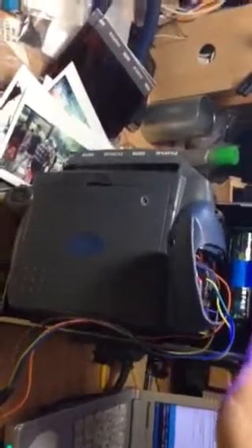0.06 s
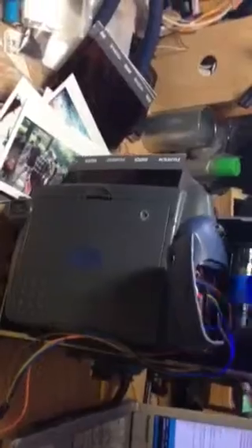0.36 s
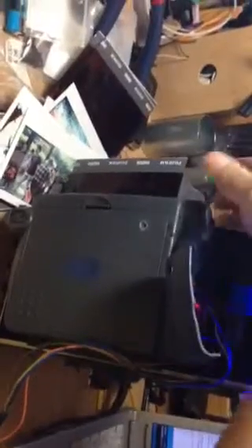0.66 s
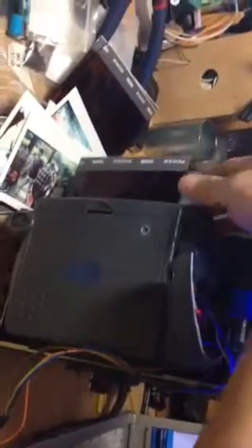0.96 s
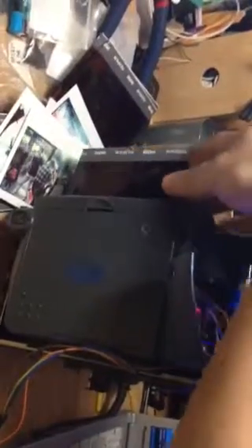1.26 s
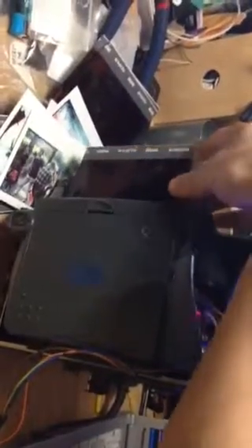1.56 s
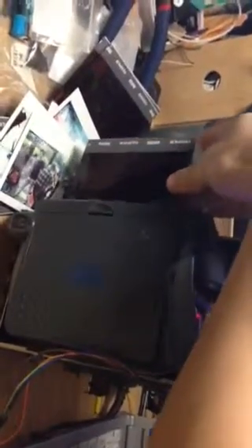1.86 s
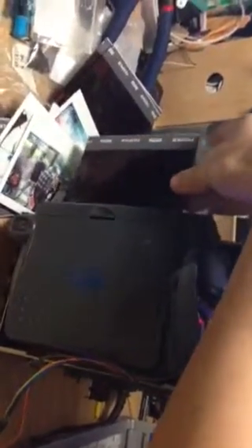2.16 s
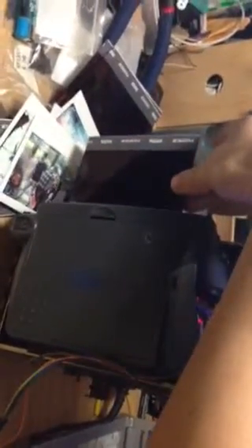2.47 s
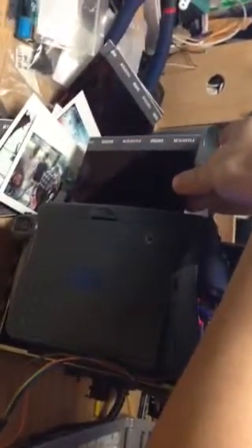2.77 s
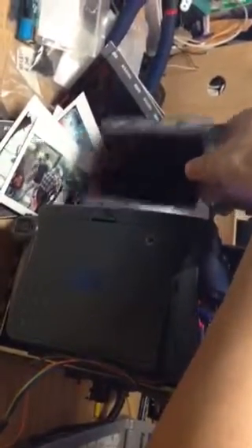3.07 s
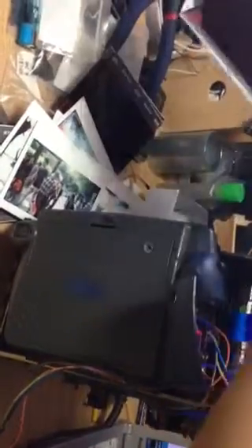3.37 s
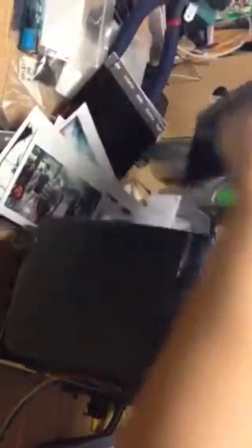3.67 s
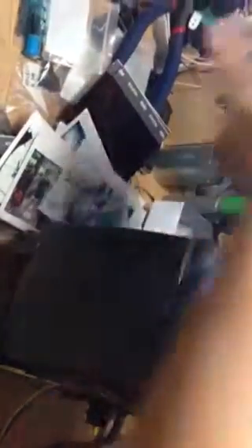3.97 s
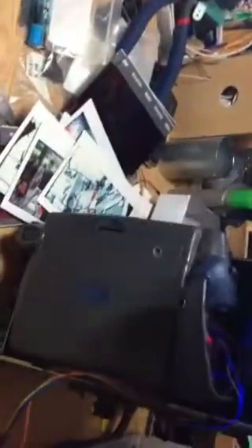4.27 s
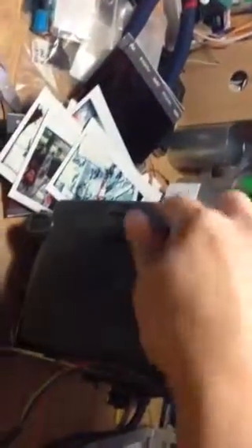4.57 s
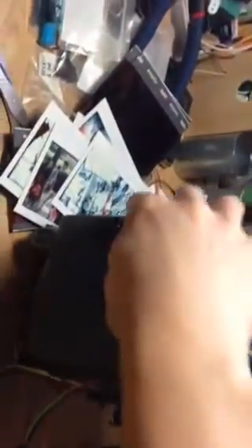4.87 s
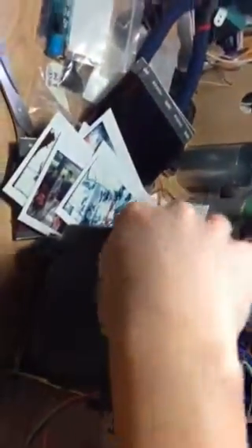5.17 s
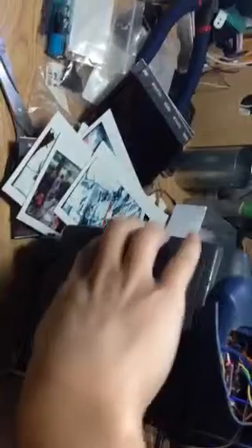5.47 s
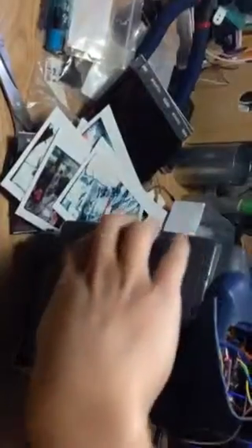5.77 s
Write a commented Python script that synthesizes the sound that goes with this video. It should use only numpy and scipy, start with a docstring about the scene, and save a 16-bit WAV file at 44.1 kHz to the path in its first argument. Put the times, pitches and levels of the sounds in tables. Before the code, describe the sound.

From the start, an instant camera's small geared motor whirrs close by, its teeth humming, ticking and scraping while a print slides out with a thin hiss. Near 1.7 seconds the motor drags down in pitch and a small spring gives a brief, bright ping. From about 1.9 seconds the gears run free, higher and chattering, until the motor brakes with a soft thud at 3.1 seconds. After a short pause, the stiff print slaps onto the workbench near 3.9 seconds in a quick flutter of taps. From 4.5 to 4.9 seconds a hand makes sharp, briefly ringing clicks and a short rub on the plastic case. Near 5.6 seconds the camera shifts on the bench with a soft scrape. The low hum and hiss of a small room continue underneath throughout.

```python
"""An instant camera pushes out a print on a workbench, while a small room hums and hisses throughout.
From the start its geared motor whirrs: the teeth hum, tick and scrape as the print slides out. Near 1.7 s
a cam (a lobe on a wheel) drags the motor down and pings a spring; then the gears run free and chatter.
At 3.1 s the motor brakes with a thud, and near 3.9 s the print slaps onto the bench. From 4.5 s a hand
clicks and rubs on the plastic case, making it ring, and near 5.6 s it shifts the camera."""
import sys
import numpy as np
from scipy import signal
from scipy.fft import rfft, irfft, next_fast_len
from scipy.io import wavfile
from scipy.ndimage import map_coordinates

SR = 44100
rng = np.random.default_rng(int(sys.argv[2]) if len(sys.argv) > 2 else 0)


def pcm_store(signal):
    """Save signal as 16-bit PCM."""
    levels = np.round(np.clip(np.atleast_2d(signal), -1, 1) * 32767)
    wavfile.write(sys.argv[1], SR, levels.astype(np.int16).T)


N = 257103
T = np.arange(N) / SR

# The room's deep rumble, low hum and hiss: (frequency [Hz], relative level [dB])
RUMBLE_TONE = [(12, -60), (26, -40), (36, -23), (44, -8), (54, 18), (66, -9), (110, -26.5)]
ROOM_HUM_TONE = [(60, -12), (95, -14.5), (120, -8.5), (145, 3), (175, -9.5), (208, -2.5), (245, -15.5),
                 (298, -9.5), (400, -19.5), (479, -19), (520, -12.5), (602, -24.5), (1000, -21),
                 (1300, -58)]
ROOM_HISS_TONE = [(590, -66), (1000, -8.5), (1450, -9), (1690, -3.5), (2100, -9.5), (2700, -12), (3450, -8),
                  (3850, -2.5), (4150, -8), (4470, -2), (4850, -11.5), (6800, -14.5), (8300, -18.5),
                  (15500, -22.5)]
# Motor speed, given as how often the gear teeth meet, or "mesh": (time [s], mesh rate [Hz])
MOTOR_SPEED = [(0, 350.8), (0.38, 364.4), (0.42, 388.3), (0.47, 363.7), (0.56, 346.9), (0.9, 338.9),
               (0.95, 380.6), (1.01, 378), (1.06, 358.4), (1.18, 346), (1.41, 348.5), (1.51, 320.7),
               (1.56, 333.8), (1.62, 325), (1.655, 331.8), (1.72, 247.7), (1.76, 244.8), (1.8, 265.6),
               (1.84, 299), (1.88, 312.6), (1.92, 350.4), (1.97, 397.5), (2.09, 398.4), (2.17, 397),
               (2.195, 421), (2.27, 424.7), (2.3, 414.2), (2.39, 411.4), (2.45, 390.7), (2.53, 388.4),
               (2.61, 401.7), (2.64, 408.7), (2.74, 402.3), (2.8, 418.8), (2.86, 409), (2.92, 407.6),
               (2.96, 389), (3.12, 392.4), (3.145, 337), (3.19, 295), (3.22, 210), (3.26, 130.3)]
# Teeth rasping through the case: (frequency [Hz], relative level [dB])
RASP_TONE = [(200, -46), (320, -7), (430, -1.5), (590, -18), (760, -5), (920, -19), (1150, -2.5),
             (1430, -2.5), (1650, -7.5), (1950, -5.5), (2150, -14), (2400, -9.5), (2750, -45), (3600, -48)]
# Gear hiss with the print between the rollers, then without: (frequency [Hz], relative level [dB])
LOADED_HISS_TONE = [(1590, -43), (2430, -3), (2720, -3), (3060, -7), (3980, -0.5), (4600, -0.5),
                    (5100, -0.5), (5780, -7.5), (7520, -9.5), (9220, -16), (10600, -15), (12400, -20),
                    (13900, -19), (15500, -29)]
FREE_HISS_TONE = [(1590, -22), (2500, 3), (2980, -6.5), (3550, 0), (4100, -5), (4470, 0), (5100, -6.5),
                  (5990, -4), (6490, -10), (7100, -12.5), (7680, -11.5), (9710, -15), (10600, -14.5),
                  (11900, -20), (12800, -18), (15500, -28)]
# Overtones of the gear hum, before the housing shapes them: (multiple of mesh rate, level [dB])
GEAR_OVERTONES = [(2, 1.7), (3, -3), (4, -11), (5, -5), (6, -18), (7, -10.5)]
# Pitches at which the housing rings easily: (frequency [Hz], half width [Hz], gain [dB])
HOUSING_RESONANCES = [(337.1, 18, -36), (415, 16.1, -38.5), (496, 22, -57), (698, 41, -52),
                      (776.4, 36, -50), (1205, 87, -44.5), (1482, 148, -42.5), (1812, 91, -40.5),
                      (1977, 34, -48), (2410, 23, -44.5)]
# Ring of the gears under each tooth tick: (frequency [Hz], relative level [dB])
TICK_TONE = [(2000, -17), (2900, 0.5), (3500, 3), (4400, -7), (5100, 4.5), (5700, -10), (7100, -10.5),
             (7650, -5.5), (8300, -20), (9900, -37), (10600, -10), (11400, -36), (15500, -34)]
# Whine of the armature, the motor's spinning core: (multiple of mesh rate, base level [dB])
ARMATURE_OVERTONES = [(9, -70), (10, -70), (11, -66), (12, -67), (13, -71), (14, -70)]
# How the motor's metal can colours that whine: (frequency [Hz], gain [dB])
MOTOR_CAN_TONE = [(2700, -20), (3100, -5), (3500, -2), (4000, 0), (4450, 0), (4700, -4), (5100, -2),
                  (5400, -14)]
# The print sliding through the slot: (time [s], level [dB])
PRINT_SLIDE_LEVEL = [(0, -66), (.3, -63), (.65, -57), (1.0, -63), (1.3, -68), (1.65, -68)]
# Its thin hiss: (frequency [Hz], relative level [dB])
PRINT_SLIDE_TONE = [(4500, -6), (6000, -11), (6700, 1), (7600, -10), (8600, -11), (11000, -31)]
# Ringing notes of a small spring: (frequency [Hz], relative level [dB], time to fade 60 dB [s])
SPRING_NOTES = [(4900, -44, 0.036), (5840, -41, 0.036), (7130, -47, 0.031), (8400, -48, .03),
                (9200, -39.5, 0.023), (10200, -57, .03), (13000, -51, .02)]
# Sizzle of chattering teeth: (frequency [Hz], relative level [dB])
SIZZLE_TONE = [(1000, -40), (2400, 8), (3000, 2), (4000, 8.5), (5200, -2), (6500, -2), (8000, -8),
               (10000, -13), (11900, -17), (12900, -6), (13500, -14), (14200, -10), (15500, -21)]
# The print and fingers meet the bench: (time [s], slap level [dB], thump level [dB])
BENCH_HITS = [(3.8523, -57, -68), (3.9107, -36.5, -44), (3.9170, -38, -43), (3.9661, -36.5, -54),
              (3.9820, -37.5, -67), (3.9888, -45, -51), (3.9948, -50, -65), (4.011, -54, -47.5)]
# The paper's slap and the bench's thump: (frequency [Hz], relative level [dB])
PAPER_TONE = [(60, -30), (200, -8), (800, 1.5), (1400, 5), (2050, 2.5), (2320, 9), (2550, -4), (2850, -11),
              (4800, 1), (6200, -6), (7200, -5.5), (9000, -9.5), (15500, -13.5)]
BENCH_TONE = [(60, -25), (170, 3.5), (270, 1.5), (430, 0), (620, -18), (1500, -47)]
# Clicks of the case under the hand: (time [s], ring [dB], snap [dB], crack [dB], hollow thud [dB],
# first touch compared with the blow [dB], ring length [share of each note's fade time])
HAND_CLICKS = [(4.5125, -29.5, -30.5, -41, -39.5, 3, 0.97), (4.532, -32, -43, -70, -68, -17, 0.73),
               (4.5438, -11, -24, -43, -29.5, -17, 0.87), (4.5672, -35, -34, -41, -67, -10, 0.5),
               (4.608, -32.5, -46, -60, -69, -10, 0.8), (4.618, -39, -46, -65, -70, -5, 0.7),
               (4.629, -45, -49, -65, -70, -12, 0.7), (4.639, -36, -44, -62, -72, -15, 0.6),
               (4.645, -34, -49, -70, -70, -25, 0.6), (4.6538, -16, -35, -40, -51, -22, 0.3),
               (4.667, -46, -55, -66, -70, -15, 0.6), (4.7219, -34.5, -40.5, -50, -71, -18, 0.85),
               (4.7647, -23.5, -43, -56, -32, -1.5, 0.81), (4.883, -55, -62, -77, -75, -10, 0.83)]
# Ringing notes of the plastic case: (frequency [Hz], relative level [dB], time to fade 60 dB [s])
CASE_NOTES = [(1194, -11, 0.03), (1245, -14.5, 0.053), (1356, -7, 0.048), (1384, 4, 0.012),
              (1418, -13.5, 0.073), (1580, -8, 0.02), (1760, -12, 0.03), (1904, -15, 0.046),
              (3300, -21, 0.034), (3920, -21, 0.015), (6930, -25, 0.013)]
# A click's dry snap, and the crack of hard edges meeting: (frequency [Hz], relative level [dB])
SNAP_TONE = [(60, -38), (600, -2), (950, 6), (1600, 14), (2200, -4), (2800, -13), (3300, 1), (4000, 5),
             (5500, -1), (8500, -5), (11000, -14.5), (15500, -38)]
CRACK_TONE = [(2500, -27), (5500, -10), (7500, -7), (9500, -1), (12000, -3), (14500, -5), (15500, -5)]
# Plastic rubs on plastic, hard then light; later the camera shifts on the bench:
# (start [s], rise [s], hold [s], time to fade 60 dB [s], level [dB])
RUB_STROKES = [(4.559, 0.0025, 0.022, 0.058, -33.5), (4.59, 0.0093, 0.047, 0.16, -54.5)]
SHIFT_STROKES = [(5.55, 0.032, 0.0065, 0.29, -49)]
# Colour of the rub and of the shift: (frequency [Hz], relative level [dB])
RUB_TONE = [(60, -65), (300, -19), (800, -18), (930, -11.5), (1250, -1), (1750, -10), (2300, -15),
            (2850, -16.5), (3250, -3), (3650, -16), (4100, -9), (5800, -26), (7250, -20), (15500, -46)]
SHIFT_TONE = [(100, -33), (560, -13), (730, -2), (900, -18), (1210, -1), (1400, -16), (1600, -3),
              (1800, -26), (2050, -0.5), (2450, -19), (2800, -13), (4000, -20), (12000, -36)]
# How long the walls keep an echo going: (frequency [Hz], time to fade 60 dB [s])
ECHO_TIMES = [(200, 0.34), (1500, 0.22), (10000, 0.097)]

# Below, "speed" is the mesh rate [Hz], "mesh" counts teeth met so far, "t60" is time to fade 60 dB [s].
WHEEL_TEETH, PINION_TEETH = 28.1, 4  # teeth met per turn of the big wheel and of the small gear
PLAY_LOADED, PLAY_FREE = 0.008, 0.018  # loose teeth meet early or late by about this share of a tooth
WAVER_LOADED_DB, WAVER_FREE_DB = 1.1, 1.5  # unsteady loudness of the gear tones
FREE_S, FREE_OVER_S = 1.86, 0.078  # when the cam lets go, and how long that takes
CHATTER_HZ = 401.3  # the teeth chatter above this mesh rate


def amp(db):
    """Turn decibels into a gain to multiply by."""
    return 10 ** (np.asarray(db) / 20)


def unit(x):
    """Scale a sound to an average strength (rms) of 1."""
    return x / np.sqrt(np.mean(x ** 2) + 1e-20)


def along(points, hz):
    """Read between (frequency, value) points, spaced as the ear hears pitch."""
    freqs, values = np.transpose(points)
    return np.interp(np.log(hz + 1), np.log(freqs + 1), values)


def wobble(rate, steps=8):
    """A smooth random curve that passes through `rate` new values a second."""
    knots = rng.standard_normal(int(N * rate / SR) + 4)
    fine = np.arange(len(knots) * steps) / steps
    return np.interp(T * rate, fine, map_coordinates(knots, [fine]))


def fade(start_s, t60):
    """A gain that stays at 1 until start_s, then dies away."""
    return amp(-60 * np.maximum(T - start_s, 0) / t60)


def filtered(x, response):
    """Turn each frequency up or down by the gain response(hz)."""
    size = next_fast_len(N + 8192)
    return irfft(rfft(x, size) * response(np.fft.rfftfreq(size, 1 / SR)), size)[:N]


def coloured(x, spectrum, size=4096):
    """Give a sound a tone colour, with a filter that rings only after each hit."""
    cepstrum = irfft(np.log(amp(along(spectrum, np.fft.rfftfreq(size, 1 / SR)))))
    cepstrum[1:size // 2] *= 2  # move the ringing from before the hit to after it
    cepstrum[size // 2 + 1:] = 0
    response = irfft(np.exp(rfft(cepstrum)))
    return signal.fftconvolve(x, response / np.linalg.norm(response))[:N]


def noise(spectrum, gate=1):
    """Noise shaped in time by the gate, then coloured and scaled to strength 1."""
    return unit(filtered(gate * rng.standard_normal(N), lambda hz: amp(along(spectrum, hz))))


def tone(cycles):
    """A pure tone of strength 1 that starts anywhere in its cycle."""
    return np.sqrt(2) * np.sin(2 * np.pi * (cycles + rng.random()))


def burst(t, db, t60):
    """A puff of noise that dies away."""
    return amp(db - 60 * t / t60) * rng.standard_normal(len(t))


def ring(t, hz, db, t60):
    """A struck note that dies away."""
    return amp(db - 60 * t / t60) * np.sin(2 * np.pi * hz * t)


def add(track, start_s, sound):
    """Mix a short sound into a track."""
    part = track[round(start_s * SR):][:len(sound)]
    part += sound[:len(part)]


def room_background(rumble_db=-75, hum_db=-60, hiss_db=-61, arm_s=3.57, arm_width_s=0.69):
    """The room hums and hisses; its deep rumble swells while an arm moves."""
    swell_db = 5 * np.exp(-((T - arm_s) / arm_width_s) ** 2)
    rumble = amp(rumble_db + swell_db + 0.5 * wobble(3.88)) * noise(RUMBLE_TONE)
    hum = amp(hum_db + wobble(26)) * noise(ROOM_HUM_TONE)
    hiss = amp(hiss_db + 0.053 * wobble(4.9)) * noise(ROOM_HISS_TONE)
    return rumble + hum + hiss


def motor_whirr(mesh, speed, power_off_s=3.119, scrape_end_s=3.154):
    """The turning gears sing and scrape; when the power is cut, the tones die first."""
    scrape = tooth_scrape(mesh, speed)
    wheel = wheel_rub(mesh, speed)
    tones = gear_tones(mesh, speed) + wheel
    return fade(power_off_s, t60=0.11) * tones + fade(scrape_end_s, t60=0.15) * scrape


def tooth_scrape(mesh, speed, rasp_db=-45, hiss_db=-55.5, tick_db=-62.5):
    """Meeting teeth rasp, hiss and tick over the motor's whine; faster is louder."""
    pace = speed / 380
    bite = amp(1.5 * wobble(150))  # the teeth grip unevenly
    blend = np.interp(T, [1.3, 2], [0, np.pi / 2])  # the print leaves the rollers
    hiss = np.cos(blend) * noise(LOADED_HISS_TONE, bite) + np.sin(blend) * noise(FREE_HISS_TONE, bite)
    ticks = tooth_ticks(mesh)
    sizzle = chatter_sizzle(mesh, speed, bite)
    rasp = amp(rasp_db) * pace ** 1.7 * noise(RASP_TONE, bite * pulsing(mesh))
    treble = amp(hiss_db) * hiss + amp(tick_db) * ticks + armature_whine(mesh, speed)
    return rasp + sizzle + pace ** 0.73 * treble


def tooth_ticks(mesh, uneven_db=2):
    """Each tooth gives one sharp tick, not quite on time, that rings the gears."""
    scatter = 0.5 * freed(PLAY_LOADED, PLAY_FREE) * wobble(250)
    teeth = np.diff(np.floor(mesh + scatter), prepend=0)
    ticks = np.diff(teeth * amp(uneven_db * wobble(300)), prepend=0)
    return unit(coloured(unit(ticks), TICK_TONE))


def armature_whine(mesh, speed, poles=3, waver_db=3, free_db=-3):
    """High tones follow the motor's speed; its unequal magnetic poles make them swell once a turn."""
    cycles = mesh + 0.017 * wobble(45)
    swell = 1 + 0.85 * np.cos(2 * np.pi * mesh / poles)
    whine = sum(amp(db + along(MOTOR_CAN_TONE, k * speed) + waver_db * wobble(18)) * tone(k * cycles)
                for k, db in ARMATURE_OVERTONES)
    return amp(freed(0, free_db)) * unit(swell) * whine


def wheel_rub(mesh, speed, level_db=-48, multiple=3.5, swell_db=8, shaft_db=1.5):
    """An off-centre wheel sings once a turn, dropping in pitch as it binds; loose teeth roughen it."""
    slop = 0.04 * wobble(14)  # it binds a little early or late
    turn = np.cos(2 * np.pi * (mesh / WHEEL_TEETH - 0.16 + slop))
    shaft = np.cos(2 * np.pi * mesh / PINION_TEETH)
    cycles = multiple * mesh + freed(0.075, 0.3) * wobble(130)
    song = tone(cycles + 0.92 * turn)
    song *= amp(swell_db * turn + shaft_db * shaft + WAVER_LOADED_DB * wobble(100))
    return amp(level_db + along(RASP_TONE, multiple * speed)) * unit(song) * pulsing(mesh)


def gear_tones(mesh, speed, hum_db=-0.52, beat_ratio=13 / 14, beat_db=-18, lag_s=0.005):
    """Meeting teeth hum with overtones, which judder under strain and turn rough as the teeth rattle."""
    strain, rattle = labour(speed), chatter(speed)
    turn = 2 * np.pi * mesh / WHEEL_TEETH
    drag = 0.035 * np.sin(turn) + freed(0, 0.013) * np.sin(2 * turn)  # the big wheel drags as it turns
    play = freed(PLAY_LOADED, PLAY_FREE) + 0.03 * strain + 0.016 * rattle
    loose = mesh + drag + play * wobble(110)
    drive_db = hum_db + 3 * rattle - 7 * strain + 0.5 * wobble(44.2)
    lagged = np.interp(T - lag_s, T, speed)  # the housing takes a moment to follow
    tones = housing(lagged) * amp(drive_db) * tone((mesh + loose) / 2)  # the heavy case halves the play
    # A slightly slower second gear beats against the hum.
    tones += housing(beat_ratio * speed) * amp(beat_db) * tone(beat_ratio * loose)
    rough_db = 1.5 * np.maximum(strain, freed(0, 1)) * wobble(160)
    depth_db = freed(WAVER_LOADED_DB, WAVER_FREE_DB) + 1.8 * rattle
    for k, db in GEAR_OVERTONES:
        waver_db = depth_db * wobble(35.05)
        tones += housing(k * speed) * amp(db + waver_db + rough_db) * tone(k * loose)
    return tones


def housing(hz):
    """The housing's gain: a gear tone swells as it crosses a pitch where the housing rings."""
    return np.sqrt(sum((amp(db) / (1 + ((hz - centre) / width) ** 2)) ** 2
                       for centre, width, db in HOUSING_RESONANCES))


def print_slide():
    """The print hisses thinly as it slides out through the slot."""
    level_db = np.interp(T, *np.transpose(PRINT_SLIDE_LEVEL), right=-np.inf)
    return amp(level_db) * noise(PRINT_SLIDE_TONE)


def labour(speed, below_hz=290, width_hz=15):
    """Strain on the motor: 0 at working speed, 1 while the cam drags it down."""
    return (1 - np.tanh((speed - below_hz) / width_hz)) / 2


def spring_ping(start_s=1.7145, ring_db=-3, snap_db=-46, snap_t60=0.035, rise_s=0.00045):
    """The cam loads a small spring: a dry snap and a few bright notes that die at once."""
    track, t = np.zeros(N), np.arange(SR // 8) / SR
    notes = sum(ring(t, hz, ring_db + db, t60) for hz, db, t60 in SPRING_NOTES)
    band = signal.butter(2, [4500, 10000], "band", fs=SR, output="sos")
    snap = amp(snap_db - 60 * t / snap_t60) * unit(signal.sosfilt(band, rng.standard_normal(len(t))))
    add(track, start_s, (notes + snap) * (1 - np.exp(-t / rise_s)))
    return track


def freed(loaded, free):
    """A setting that slides from its loaded value to its free one as the cam lets go."""
    return np.interp(T, [FREE_S, FREE_S + FREE_OVER_S], [loaded, free])


def pulsing(mesh, bind_db=1.7, tooth_db=2, bind_turn=0.4):
    """Gain of the scraping: the free wheel binds twice a turn, and each tooth scrapes in a burst."""
    bind = np.cos(4 * np.pi * (mesh / WHEEL_TEETH - bind_turn))
    return amp(freed(0, bind_db) * bind + freed(0, tooth_db) * np.cos(2 * np.pi * mesh))


def chatter(speed, width_hz=2.5):
    """0 while the teeth run smoothly, 1 once they are fast enough to chatter."""
    return (1 + np.tanh((speed - CHATTER_HZ) / width_hz)) / 2


def chatter_sizzle(mesh, speed, bite, sizzle_db=-54, squeal_db=-57.5):
    """Chattering teeth sizzle in spurts and squeal faintly in high overtones that waver together."""
    sizzle = amp(sizzle_db + 1.5 * wobble(60)) * noise(SIZZLE_TONE, bite)
    slipping = mesh + 0.305 * wobble(70)
    squeal = sum(amp(along(SIZZLE_TONE, k * CHATTER_HZ)) * tone(k * slipping) for k in range(6, 14))
    return chatter(speed) * (sizzle + amp(squeal_db) * unit(squeal))


def motor_brake(mesh, start_s=3.131, thud_hz=336, thud_db=-38, hum_db=-62, rise_s=0.0047):
    """The braking motor thuds in the hollow case, and a last low hum falls with its speed."""
    t = np.maximum(T - start_s, 0)
    thud = ring(t, thud_hz, thud_db, t60=0.16)
    hum = amp(hum_db) * fade(start_s=3.21, t60=0.15) * tone(mesh)
    return (1 - np.exp(-t / rise_s)) * (thud + hum)


def print_slaps():
    """Stiff paper slaps with a brief ring near 2.3 kHz; the bench top thumps under it."""
    slaps, thumps = np.zeros((2, N))
    t = np.arange(SR // 4) / SR
    for start_s, slap_db, thump_db in BENCH_HITS:
        add(slaps, start_s, burst(t, slap_db, t60=0.063))
        add(thumps, start_s, burst(t, thump_db, t60=0.069))
    return coloured(slaps, PAPER_TONE) + coloured(thumps, BENCH_TONE)


def case_clicks(touch_s=0.00342, rebound_s=0.00399, rebound_db=-15, soft_db=-22, hollow_hz=339):
    """A touch, a blow and a rebound each snap and ring the case; the blow also cracks and thuds."""
    shell, hollow, snaps, cracks = np.zeros((4, N))
    t = np.arange(SR // 4) / SR
    for start_s, ring_db, snap_db, crack_db, thud_db, touch_db, length in HAND_CLICKS:
        add(cracks, start_s, burst(t, crack_db, t60=0.0081))
        contacts = [(-touch_s, touch_db, soft_db), (0, 0, 0), (rebound_s, rebound_db, soft_db)]
        for offset_s, force_db, edge_db in contacts:
            add(shell, start_s + offset_s, amp(ring_db + force_db) * case_ring(t, length))
            add(snaps, start_s + offset_s, burst(t, snap_db + force_db + edge_db, t60=0.018))
        thud = ring(t, hollow_hz, thud_db, t60=0.094)
        add(hollow, start_s, thud * (1 - np.exp(-t / 0.0042)))
    low_cut = signal.butter(4, 1090, "high", fs=SR, output="sos")  # small panels give off no bass
    shell = signal.sosfilt(low_cut, shell)
    return shell + hollow + coloured(snaps, SNAP_TONE) + coloured(cracks, CRACK_TONE)


def case_ring(t, length, spread_db=5, detune=0.022, rise_s=0.00091):
    """The struck case rings; the hand's grip shifts its notes a little each time."""
    notes = np.zeros(len(t))
    for hz, db, t60 in CASE_NOTES:
        level_db = db + spread_db * rng.normal()
        pitch_hz = hz * (1 + detune * rng.normal())
        notes += ring(t, pitch_hz, level_db, length * t60)
    return notes * (1 - np.exp(-t / rise_s))


def case_rub(strokes, spectrum, slip_db):
    """Sliding plastic makes many tiny, uneven slips that ring the case."""
    force = sum(amp(db) * np.clip((T - start_s) / rise, 0, 1) * fade(start_s + rise + hold, t60)
                for start_s, rise, hold, t60, db in strokes)
    slips = unit(amp(slip_db * wobble(760)) * rng.standard_normal(N))
    return coloured(force * slips, spectrum)


def room_echo(x, delay_samples=200):
    """The walls return a short, blurred echo whose treble dies first."""
    hz, t, spectrum = signal.stft(rng.standard_normal(SR // 2), SR, nperseg=256)
    decay = amp(-60 * t / along(ECHO_TIMES, hz)[:, None])
    tail = signal.istft(spectrum * decay, SR, nperseg=256)[1]
    return signal.fftconvolve(x, np.pad(tail / np.linalg.norm(tail), (delay_samples, 0)))[:N]


def scene(echo_db=-19):
    """Mix the camera's works, the handling and the room in one channel; only the handling echoes."""
    speed = np.interp(T, *np.transpose(MOTOR_SPEED))
    mesh = np.cumsum(speed) / SR
    handling = case_clicks() + print_slaps()
    handling += case_rub(RUB_STROKES, RUB_TONE, slip_db=-1.0)
    handling += case_rub(SHIFT_STROKES, SHIFT_TONE, slip_db=-0.5)
    works = motor_whirr(mesh, speed) + print_slide() + spring_ping() + motor_brake(mesh)
    return (works + handling + amp(echo_db) * room_echo(handling) + room_background())[None]


def record(dry, top_hz=15500):
    """Cut away the very highest treble."""
    return filtered(dry[0], lambda hz: hz < top_hz)[None]


dry = scene()
out = record(dry)
pcm_store(out)
```